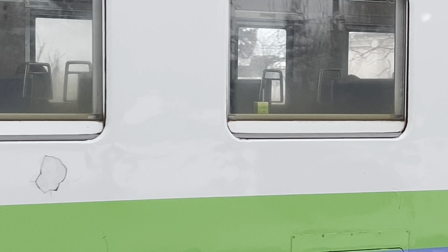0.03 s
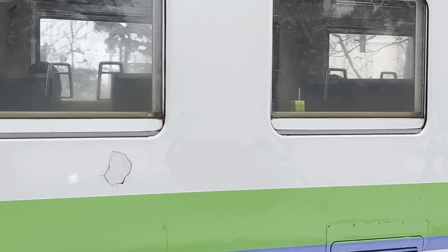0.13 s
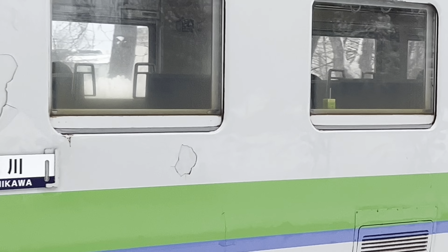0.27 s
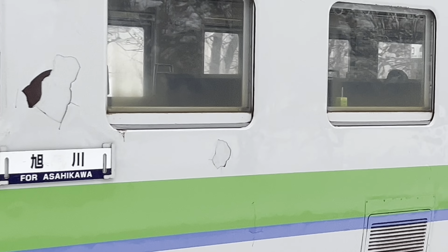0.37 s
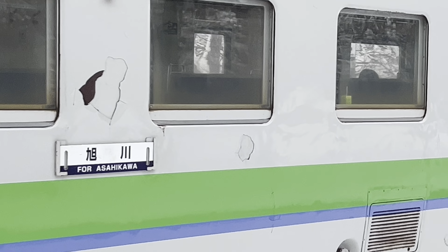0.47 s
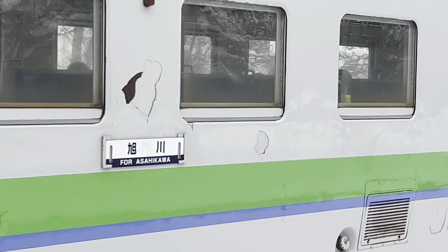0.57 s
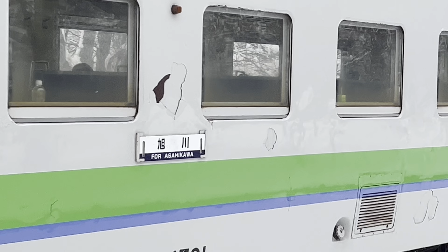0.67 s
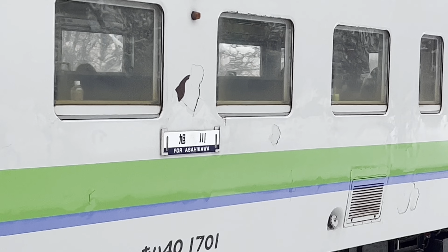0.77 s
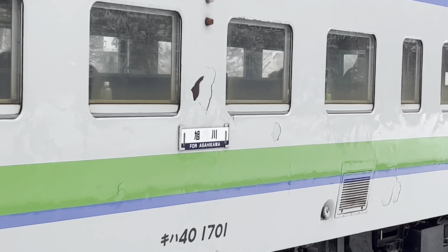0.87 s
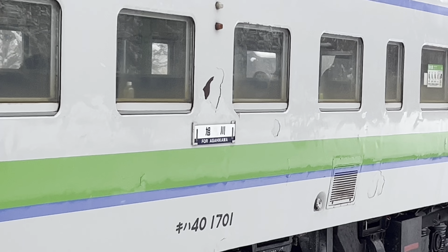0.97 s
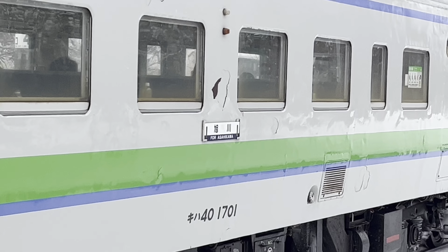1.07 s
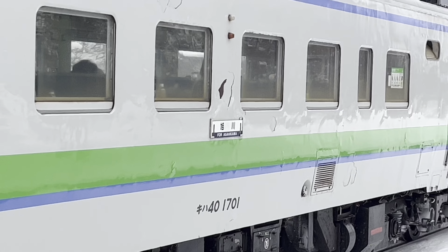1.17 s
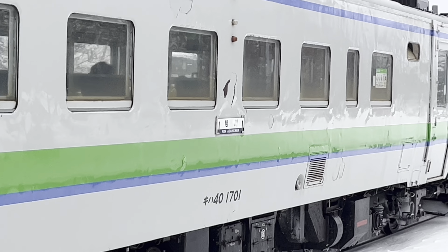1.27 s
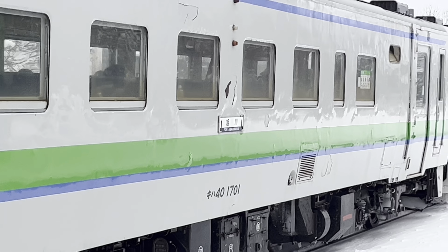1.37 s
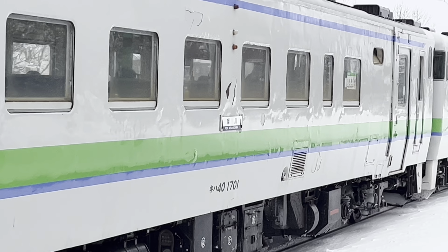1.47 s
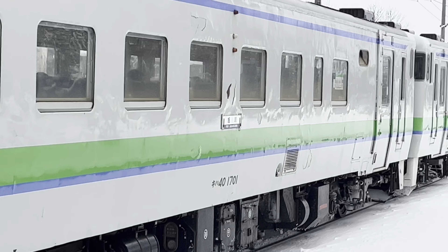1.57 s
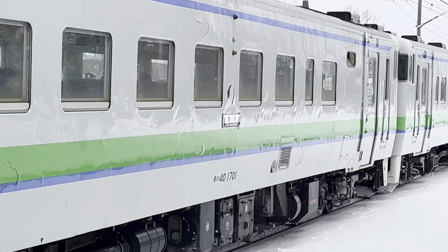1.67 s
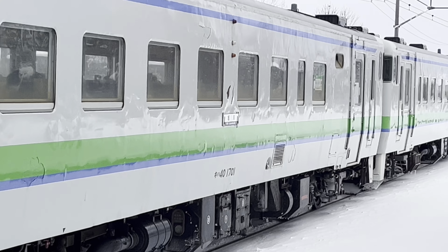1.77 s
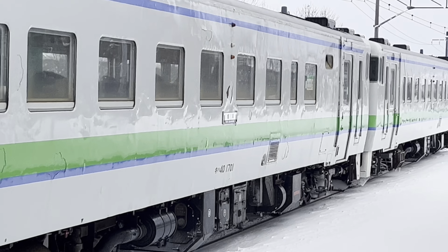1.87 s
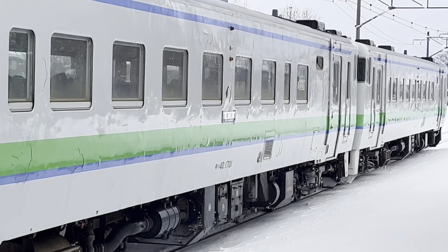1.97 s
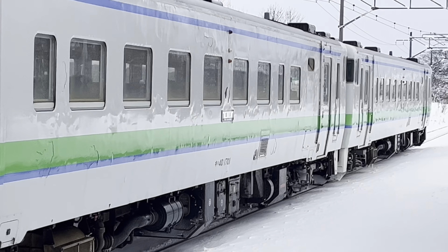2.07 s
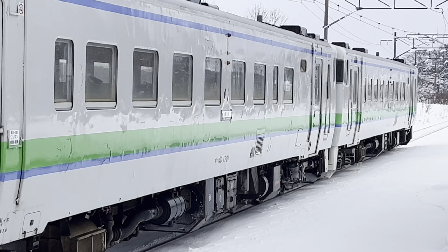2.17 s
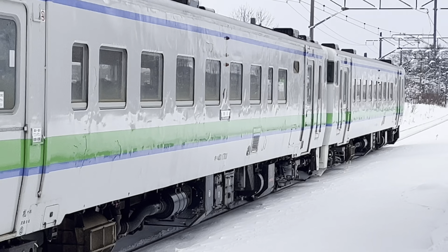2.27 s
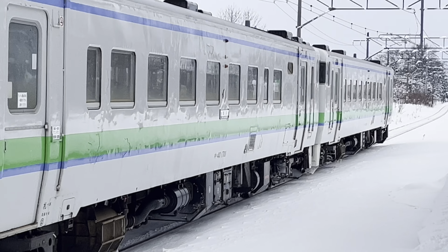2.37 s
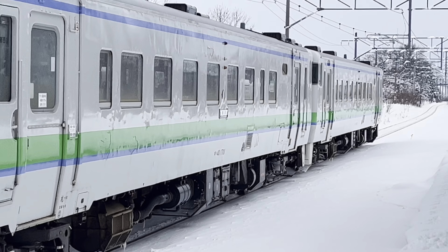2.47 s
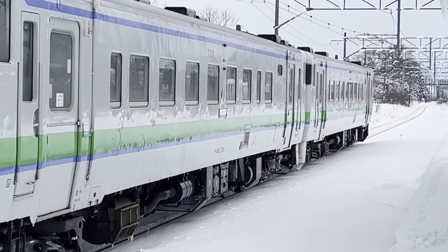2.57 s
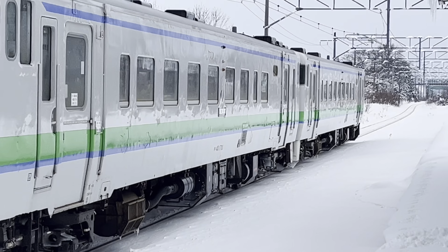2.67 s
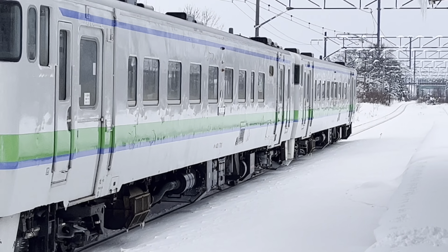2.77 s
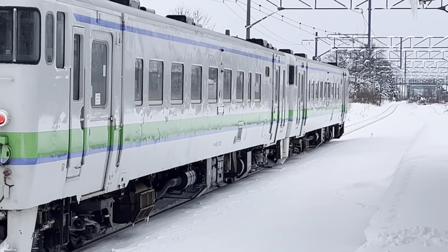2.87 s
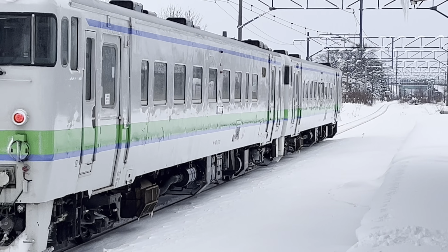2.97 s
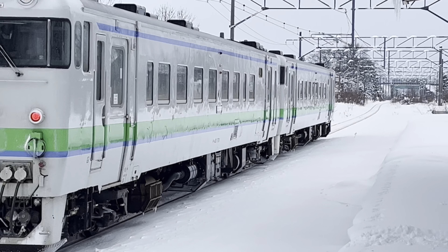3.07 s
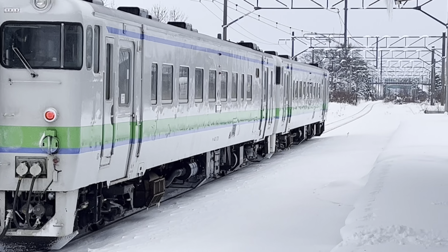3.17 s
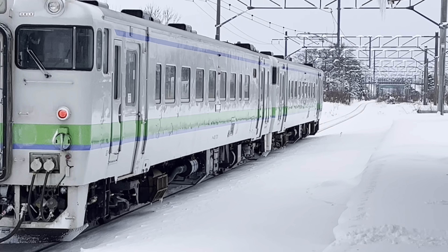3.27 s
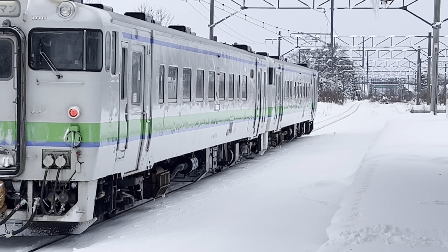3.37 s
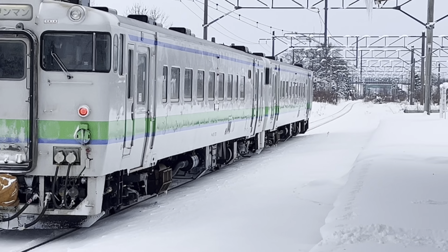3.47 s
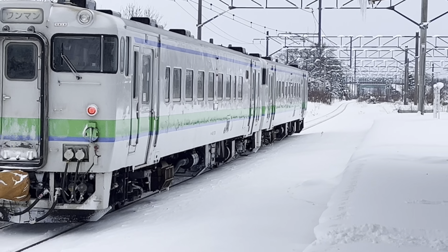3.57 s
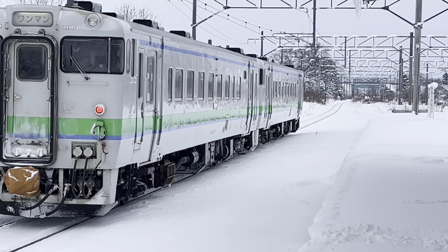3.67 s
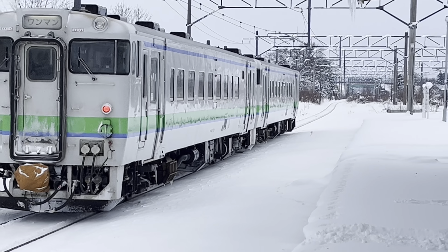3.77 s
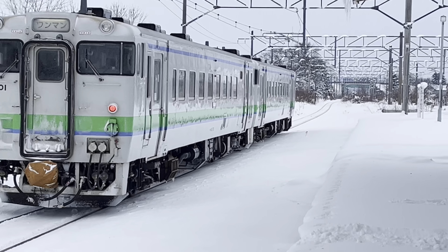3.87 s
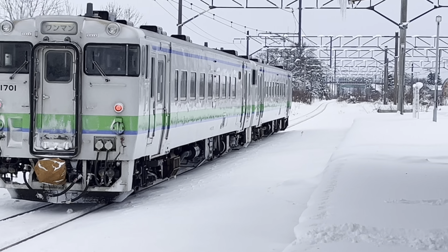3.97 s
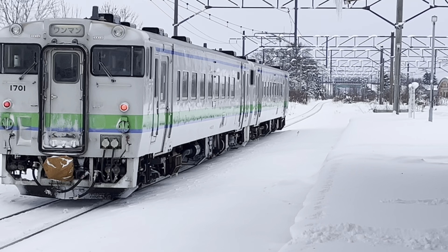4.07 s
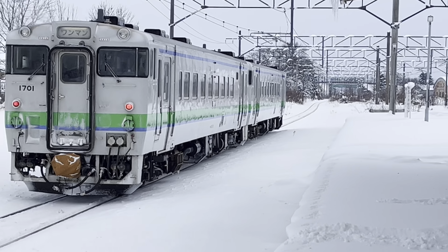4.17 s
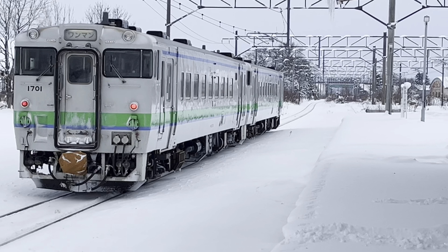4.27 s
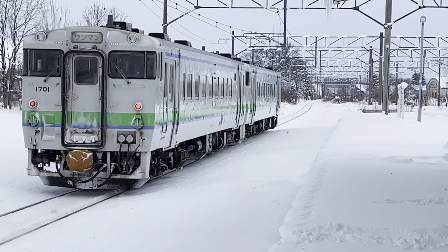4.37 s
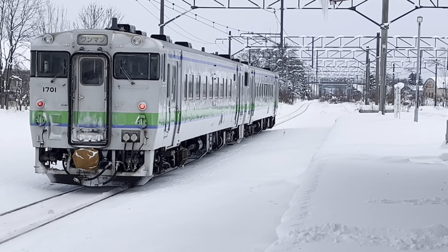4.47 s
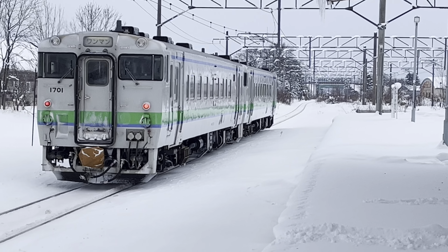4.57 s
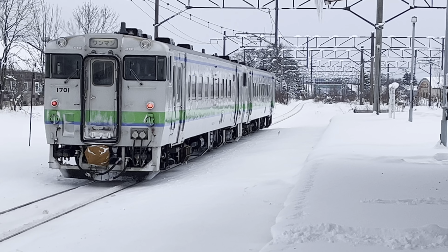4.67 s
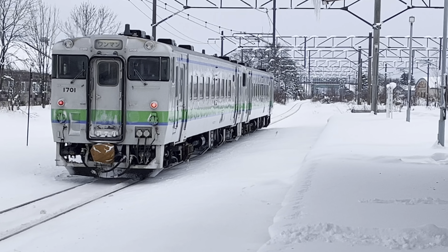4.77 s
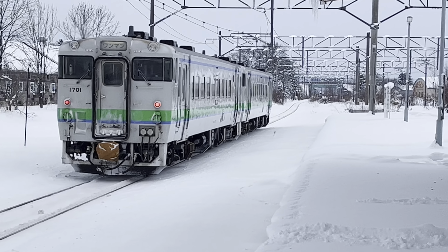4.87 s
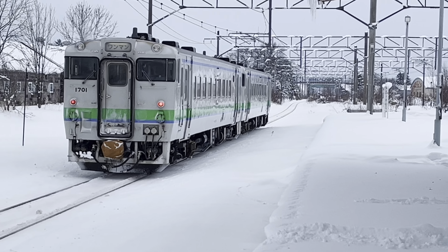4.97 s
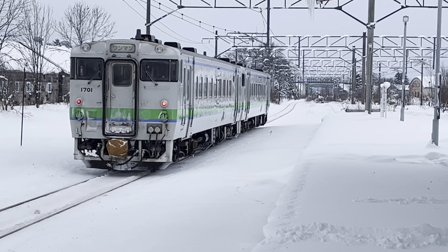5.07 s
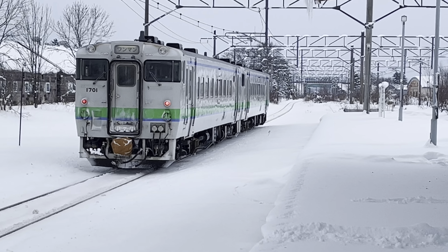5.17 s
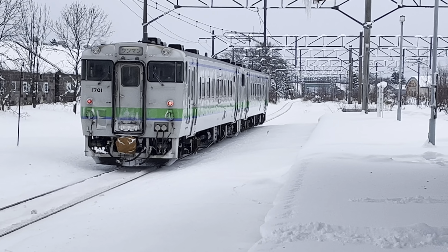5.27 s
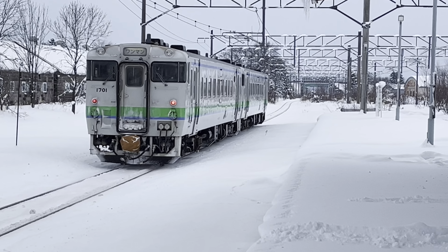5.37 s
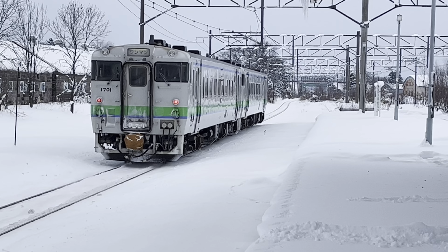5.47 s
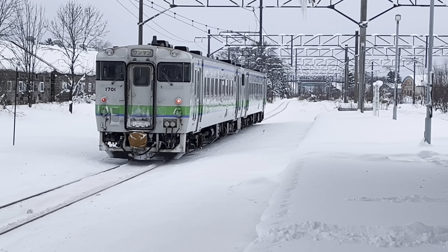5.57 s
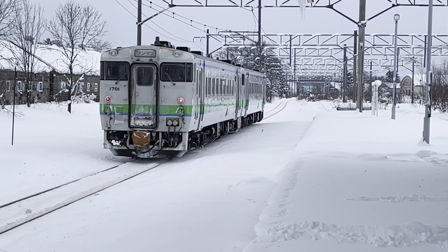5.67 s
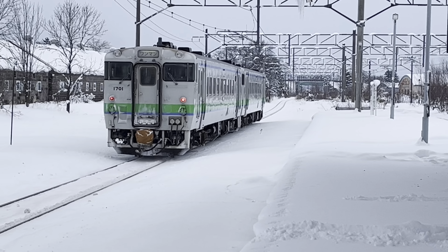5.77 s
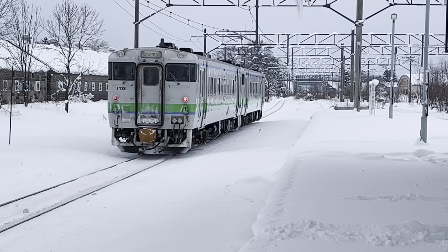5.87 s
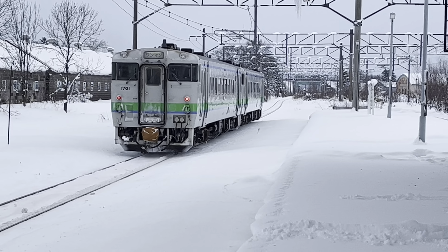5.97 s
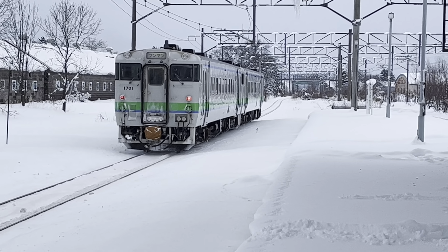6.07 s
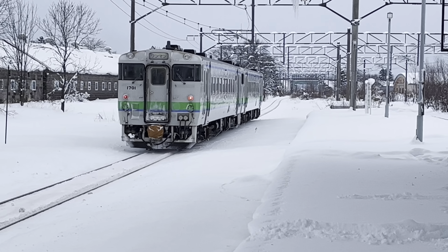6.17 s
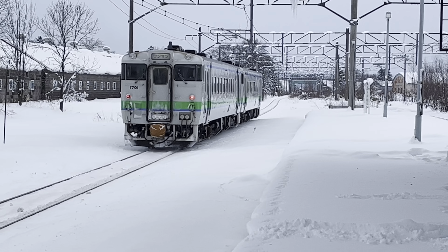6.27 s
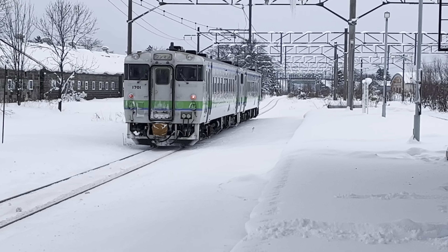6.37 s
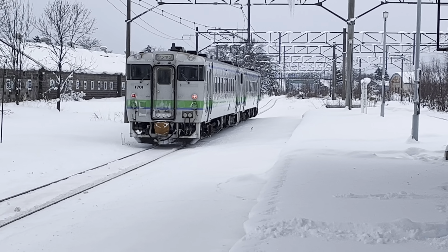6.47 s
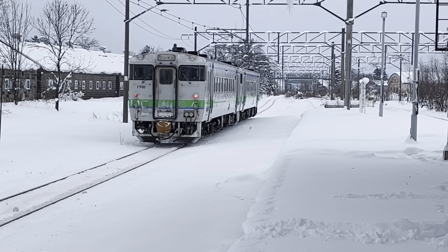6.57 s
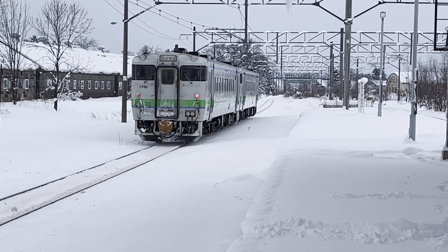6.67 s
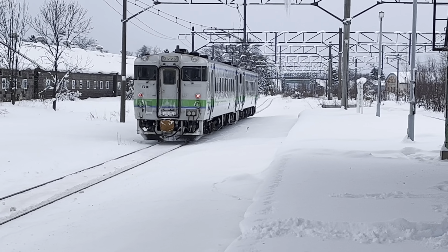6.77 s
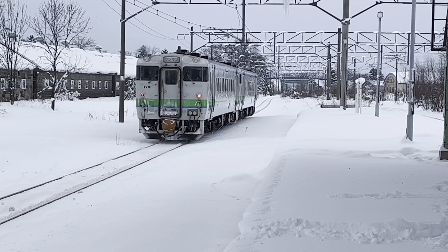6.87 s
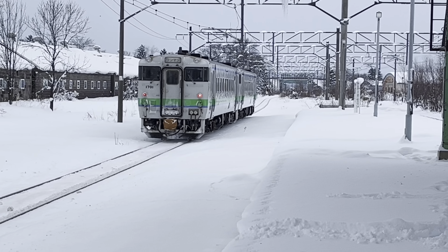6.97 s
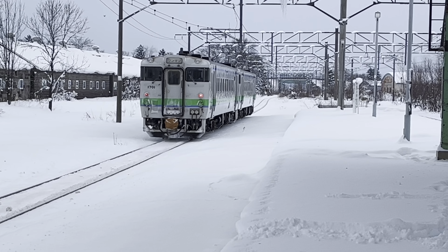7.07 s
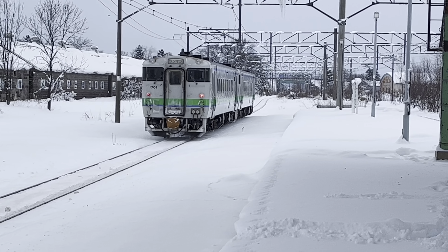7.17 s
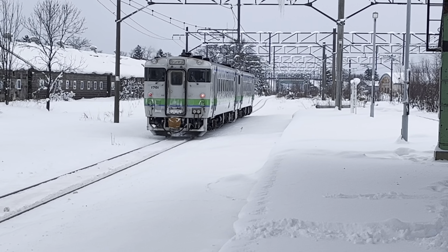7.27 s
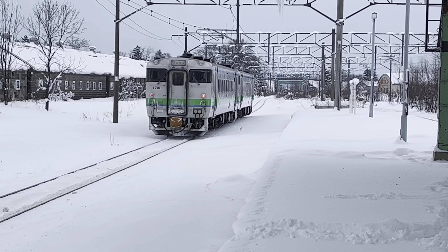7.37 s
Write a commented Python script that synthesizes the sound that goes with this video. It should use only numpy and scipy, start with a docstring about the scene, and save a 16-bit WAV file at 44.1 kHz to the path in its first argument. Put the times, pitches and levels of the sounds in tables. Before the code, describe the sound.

Outdoors on a snowy platform, with no echo, a diesel railcar is already passing very close at 0 s. Its underfloor engine runs at full power: a thick, rapidly pulsing roar, metallic clatter, bright hiss, and irregular hard steel knocks, strongest around 0.2-1.4 s. A buzzing drone and gear whine swell as parts go by, with a thin high turbo whistle from about 1 s. Pitch rises slightly until 1.8 s, then sags as the sound shifts from the side to straight ahead. At 2.55 s power is cut: knocking drops away, the engine slows and whistles slide downward, over wheel rumble and low, lumpy air gusts from 2.8 to 3.8 s. Around 3.84 s the engine pulls again with a brief breathy upward sweep, slower and throbbing. Faint ticks accompany it from 4.4 to 6 s. It slowly quickens while receding, turning duller after 6 s and still audible at 7.4 s.

```python
"""Diesel railcar pulling out

A railcar pulls out past a snowy platform, its underfloor six-cylinder engine at full power: noise pulsed
by the firings makes roar, clatter and hiss, ringing noise the knock and clang, and sine waves the drone.
At 2.55 s the fuel is cut for a gear change: the knock sinks and the turbocharger's whistles wind down.
At 3.84 s the engine pulls again, slower and farther off, over wheel rumble and gusts of filtered noise."""
import sys
import numpy as np
from scipy import signal
from scipy.fft import rfft, irfft, next_fast_len
from scipy.io import wavfile
from scipy.ndimage import uniform_filter1d

SR = 44100
rng = np.random.default_rng(int(sys.argv[2]) if len(sys.argv) > 2 else 0)


def master_out(mix):
    """Clip the mix to full scale and print it as 16-bit PCM to the path in sys.argv[1]."""
    frames = np.transpose(np.atleast_2d(mix))
    ceiling = np.clip(frames, -1, 1)
    pcm = np.round(ceiling * 32767).astype(np.int16)
    wavfile.write(sys.argv[1], SR, pcm)


N = 327743
TIME = np.arange(N) / SR  # s
SIZE = next_fast_len(N + SR // 10, True)
BINS = np.maximum(np.fft.rfftfreq(SIZE, 1 / SR), 1)  # Hz

# share of roar and clatter that repeats every cycle, and how much of its pattern it keeps (both 0-1)
ROAR_REPEAT, ROAR_MEMORY = 0.4, 0.75
CLATTER_REPEAT, CLATTER_MEMORY = 0.55, 0.58
# scales the roar's unsteadiness (dB): strong beside the bay and far off, none at half nearness
ROAR_FLICKER_DB = 1.6

# roar spectrum beside the open engine bay: (frequency [Hz], relative density [dB per Hz])
ROAR_BESIDE = [(60, -33), (130, 0.5), (200, -5.5), (330, -0.5), (450, -3), (600, 1.5), (800, -5.5),
               (1400, -21), (4000, -62)]
# roar spectrum far from the bay: (frequency [Hz], relative density [dB per Hz])
ROAR_DISTANT = [(60, -25), (130, -1.5), (220, -1.5), (330, -3.5), (420, -0.5), (520, -0.5), (640, -10.5),
                (800, 3), (1400, -12.5), (4000, -74)]
# brief fades and swells of the roar: (time [s], half length [s], lift [dB])
ROAR_LIFTS = [(2.45, 0.07, 3), (5.1, 0.22, -4), (7.15, 0.091, 3)]


def roar(turns):
    """Low noise swelling at each firing; its colour changes as the engine bay turns away."""
    loose = pulsing(turns, depth=0.8, decay_s=0.0064)
    low = repeating(turns, ROAR_REPEAT, ROAR_MEMORY, loose)
    tone = near_to_far(coloured(low, ROAR_BESIDE), -0.5, coloured(low, ROAR_DISTANT), 0.5)
    flicker_db = (0.5 - bay()) * ROAR_FLICKER_DB * drift(9.8)
    gain = passing(level_db=-23.5, abreast_s=0.19, distance_m=4.83, falloff=1.613, coasting_db=-1.0)
    return tone * gain * from_db(humps_db(ROAR_LIFTS) + flicker_db)


# clatter of the block beside the bay: (frequency [Hz], relative density [dB per Hz])
CLATTER_BESIDE = [(300, -39), (600, -26), (760, -3), (1000, -1), (1220, -6.5), (1420, -0.5), (1650, -7),
                  (2100, -8.5), (2500, -18), (3200, -26), (6000, -60)]
# clatter of the block far off: (frequency [Hz], relative density [dB per Hz])
CLATTER_DISTANT = [(300, -34), (600, -1.5), (760, -5), (880, 0), (1020, -9), (1220, 0.5), (1620, -2),
                   (2100, -6.5), (2500, -14.5), (3200, -52), (6000, -58)]
# resonances of block and underframe: (frequency [Hz], width [Hz], lift [dB])
BLOCK_RESONANCES = [(733, 59, 2.5), (1803, 210, 5)]


def clatter(turns):
    """Rattle of the moving parts, largely alike in every cycle, lifted by resonances of the block."""
    loose = pulsing(turns, depth=0.028, decay_s=0.0072)
    middle = repeating(turns, CLATTER_REPEAT, CLATTER_MEMORY, loose)
    beside = coloured(middle, CLATTER_BESIDE, BLOCK_RESONANCES)
    distant = coloured(middle, CLATTER_DISTANT, BLOCK_RESONANCES)
    gain = passing(level_db=-24.5, abreast_s=0.74, distance_m=2.73, falloff=0.93, coasting_db=-3.5)
    return near_to_far(beside, 5.5, distant, -0.67) * gain


# hiss beside the bay: (frequency [Hz], relative density [dB per Hz])
HISS_BESIDE = [(1000, -5), (2200, 6), (2900, 1), (3900, 2), (4600, -2), (5100, -5), (7000, -5.5),
               (9000, -3), (10500, -9), (14500, -14.5)]
# hiss far off: (frequency [Hz], relative density [dB per Hz])
HISS_DISTANT = [(1000, -26), (2200, -2), (2900, 0), (3700, 3), (4600, -6), (5100, -8.5), (7000, -8),
                (8800, -13), (10500, -15), (14500, -25)]


def hiss(turns):
    """Bright noise with a partial pulse at each firing and a flickering level."""
    high = from_db(0.73 * drift(22.09)) * pulsing(turns, depth=0.34, decay_s=0.01)
    tone = near_to_far(coloured(high, HISS_BESIDE), 4.5, coloured(high, HISS_DISTANT), 2.0)
    return tone * passing(level_db=-32, abreast_s=0.63, distance_m=3.51, falloff=1.474, coasting_db=-2.0)


# repeating share, and how much of its pattern it keeps (both 0-1)
CLANG_REPEAT, CLANG_MEMORY = 0.93, 0.72
# width of the resonance (Hz); the throb comes this share of a cycle before its place in the table
CLANG_WIDTH_HZ, THROB_LEAD = 210, 0.03
EVEN_S = 0.012  # the shaking's own level is evened over this time, so the throb stands clear

# pitch of the block's main resonance: (time [s], frequency [Hz])
BLOCK_PITCH = [(0, 926), (2, 843), (3, 932), (5, 900), (6, 945), (7.43, 973)]
# throb within one engine cycle, scaled by the throb depth: (cycle position [0-1], level [dB])
CYCLE_THROB = [(0, -5), (.035, -1), (.1, -8), (.17, 0), (.31, -2), (.39, 6), (.46, 1), (.52, -7),
               (.575, 10), (.63, 8), (.67, -8), (.72, -3), (.8, -6), (.89, 4)]
# brief fades and swells of the resonance: (time [s], half length [s], lift [dB])
CLANG_LIFTS = [(0.81, 0.097, -8), (1.03, 0.048, 3.5), (2.85, 0.26, 3.5), (7.38, 0.094, -2.5)]


def clang(turns):
    """Some cylinders shake the block harder, so its main resonance throbs alike in every cycle."""
    hz, = in_time(BLOCK_PITCH)
    position, throb_db = np.transpose(CYCLE_THROB)
    # weak while coasting, deep under load behind the car
    hidden_loss = 1 - 0.42 * ramp(HIDDEN_S, HIDING_S)
    depth = 0.22 + fuel() * (0.95 - 0.54 * bay()) * hidden_loss
    rattle = repeating(turns, CLANG_REPEAT, CLANG_MEMORY, air())
    shake = rms_one(resonate(rattle, hz, width=162))
    power = uniform_filter1d(shake ** 2, int(EVEN_S * SR)) + 1e-3
    even = shake / power ** (.5 * np.clip(depth, 0, 1))
    throb = np.interp((turns + THROB_LEAD) % 1, position, throb_db, period=1)
    ring = rms_one(resonate(even * from_db(depth * throb), hz, CLANG_WIDTH_HZ))
    gain = passing(level_db=-23.0, abreast_s=0.64, distance_m=2.69, falloff=1.11, coasting_db=0.1)
    return ring * gain * from_db(humps_db(CLANG_LIFTS))


# no two knocks ring alike: scatter of their pitch (share) and of their strength (dB)
KNOCK_SCATTER, KNOCK_UNEVEN_DB = 0.014, 1.1

# steel resonances before the pitch ratio: (frequency [Hz], width [Hz], relative level [dB])
STEEL_MODES = [(3605, 200, 0), (4103, 340, 10.5), (6150, 740, -6.5)]
# glide of the ringing: (time [s], pitch ratio [1])
KNOCK_GLIDE = [(0, 1.055), (1.2, 1.035), (2.0, 1.01), (4.0, 1.025), (5.8, 1.04), (7.0, 1.06)]
# hardest knocks, level of the click before it rings: (time [s], level [dB])
KNOCK_ACCENTS = [(0.209, -26), (0.2756, -24), (0.3621, -27), (0.4698, -24), (0.6624, -18), (0.726, -21),
                 (0.738, -33), (0.9178, -30), (0.9497, -26.5), (1.1154, -26), (1.166, -25.5),
                 (1.3523, -30.5), (4.4643, -42), (4.5258, -48), (5.7615, -46), (5.9371, -44.5),
                 (6.2878, -48), (6.9765, -44)]


def knock(turns):
    """Each firing sets the engine's stiff steel parts ringing, far weaker without fuel."""
    pitch = in_time(KNOCK_GLIDE)[0] * (1 + KNOCK_SCATTER * drift(45))

    def ringing(clicks):
        cracks = bursts(clicks, decay_s=0.012)
        return sum(from_db(db) * resonate(cracks, hz * pitch, width) for hz, width, db in STEEL_MODES)

    steady = rms_one(ringing(firings(turns, KNOCK_UNEVEN_DB))) * from_db(2.1 * drift(17))
    gain = passing(level_db=-35.5, abreast_s=0.52, distance_m=2.22, falloff=0.89, coasting_db=-17.0)
    return gain * steady + from_db(8.5) * ringing(clicks_of(KNOCK_ACCENTS))


# unsteadiness of the orders (dB), and their phase wander (turns per multiple)
ORDER_FLICKER_DB, ORDER_WAVER = 1.1, 0.001

# engine orders, each swelling as its part goes by; the multiple is rounded to a whole number:
# (multiple of cycle rate [1], loudest at [s], half length [s], level [dB])
DRONE_ORDERS = [(6, 0.51, 1.6, -43.5), (9, 0.32, 0.15, -40), (9, 1.23, 0.17, -35.5), (9, 1.75, 0.16, -36.5),
                (11, 0.32, 0.42, -43.5), (11, 1.27, 0.38, -38.5), (12, 0.75, 0.61, -34.5),
                (12, 2.17, 0.32, -44), (15, 0.714, 0.062, -30), (15, 1.22, 0.21, -29.5),
                (15, 1.623, 0.15, -30.5), (15, 1.97, 0.51, -44.5), (18, 1.23, 0.58, -38),
                (19, 0.44, 0.13, -42), (20, 0.35, 0.27, -37), (21, 0.22, 0.78, -45), (23, 0.257, 0.12, -32),
                (24, 0.56, 0.12, -30), (26, 1.21, 0.39, -39), (30, 0.78, 0.37, -35.5),
                (33, 0.95, 0.15, -36), (36, 0.23, 0.49, -28), (36, 1.05, 0.092, -38), (38, 1.34, 0.33, -41),
                (45, 1.1, 0.2, -43), (48, 1.45, 0.13, -41), (51, 0.64, 0.084, -32), (52, 1.56, 0.12, -43),
                (53, 0.92, 0.14, -36), (54, 0.976, 0.12, -26), (56, 1.19, 0.16, -28),
                (57, 0.6, 0.096, -22.5), (57, 1.08, 0.065, -36), (58, 1.04, 0.28, -39),
                (60, 0.44, 0.23, -29.5), (68.2, 0.76, 0.14, -33)]


def drone(turns):
    """Sines at multiples of the cycle rate swell in passing, wavering a little as their paths change."""
    gains = {}
    for order, loudest_s, half_s, db in DRONE_ORDERS:
        order = round(order)
        gains[order] = gains.get(order, 0) + from_db(db) * swell(loudest_s, half_s)
    out = np.zeros(N)
    for order, gain in gains.items():
        phase = order * turns + rng.random() + ORDER_WAVER * order * drift(14.9)
        out += gain * from_db(ORDER_FLICKER_DB * drift(11.9)) * np.sin(2 * np.pi * phase)
    return np.sqrt(2) * out


# breadth of the whistles and of the intake's note (Hz), and their waver (share of the pitch)
WHISTLE_WIDTH_HZ, INTAKE_WIDTH_HZ, WHISTLE_WAVER = 55, 280, 0.003

# turbocharger whistle: (time [s], frequency [Hz], level [dB])
MAIN_WHISTLE = [(.5, 5620, -62), (.85, 6050, -57), (1.05, 6020, -42), (1.45, 6170, -51), (1.8, 6260, -50),
                (2.1, 6280, -55), (2.3, 5960, -57), (2.55, 5830, -64), (2.65, 5600, -58), (2.77, 5300, -62),
                (2.88, 5120, -57), (2.94, 5040, -68), (3.05, 4860, -61), (3.17, 4700, -65),
                (3.38, 4420, -58), (3.48, 4340, -76), (3.8, 4500, -88), (5.2, 6540, -78), (5.65, 6660, -64),
                (7.43, 6900, -97)]
# fainter, higher whistle: (time [s], frequency [Hz], level [dB])
HIGH_WHISTLE = [(1.2, 6470, -69), (1.551, 6700, -57), (1.8, 6950, -68), (2.201, 6540, -60),
                (2.6, 5980, -78), (3.2, 5650, -82), (3.48, 5120, -72), (3.6, 4900, -76), (3.7, 4900, -66),
                (3.8, 4730, -80), (3.95, 4700, -99)]
# the intake sings up as the engine takes the load again: (time [s], frequency [Hz], level [dB])
INTAKE_SWEEP = [(3.74, 5750, -110), (3.79, 5900, -52), (3.86, 6100, -67), (3.92, 6320, -61),
                (4.0, 6380, -70), (4.14, 6420, -67), (4.5, 6530, -64), (4.9, 6500, -110)]


def turbocharger():
    """Narrow noise bands: the whistles wind down without fuel, the intake sweeps up when it returns."""
    def breathy(curve, width):
        hz, db = in_time(curve)
        wavering_hz = hz * (1 + WHISTLE_WAVER * drift(25))
        return from_db(db) * rms_one(resonate(rng.standard_normal(N), wavering_hz, width))

    whistles = breathy(MAIN_WHISTLE, WHISTLE_WIDTH_HZ) + breathy(HIGH_WHISTLE, WHISTLE_WIDTH_HZ)
    return whistles + breathy(INTAKE_SWEEP, INTAKE_WIDTH_HZ)


# pitch (Hz), its wander (share), flicker (dB)
UPPER_RING_HZ, UPPER_RING_WANDER, UPPER_RING_FLICKER_DB = 1430, 0.016, 2.0


def upper_ring(turns):
    """A weaker resonance of the underframe, loudest about 1.4 s; its pitch and level wander."""
    hz = UPPER_RING_HZ * (1 + UPPER_RING_WANDER * drift(7))
    rattle = repeating(turns, CLATTER_REPEAT, CLATTER_MEMORY, air())
    ring = rms_one(resonate(rattle, hz, width=95)) * from_db(UPPER_RING_FLICKER_DB * drift(16))
    return ring * passing(level_db=-39, abreast_s=1.4, distance_m=3.4, falloff=0.66, coasting_db=-1.5)


GEAR_HZ, GEAR_RISE_HZ_PER_S = 598, 25  # pitch at the start, and its climb with road speed

# the whine stands out as the axle drive goes by: (loudest at [s], half length [s], level [dB])
AXLE_SWELLS = [(0.3, 0.25, -34), (1.94, 0.14, -39.5), (2.418, 0.26, -43)]


def transmission():
    """A slightly unsteady gear whine, a sine that rises as the train gathers speed."""
    gain = sum(from_db(db) * swell(at_s, half_s) for at_s, half_s, db in AXLE_SWELLS)
    hz = (GEAR_HZ + GEAR_RISE_HZ_PER_S * TIME) * (1 + 0.004 * drift(60))
    whine = np.sqrt(2) * np.sin(2 * np.pi * np.cumsum(hz) / SR)
    return gain * from_db(2.2 * drift(20)) * whine


# while the engine labours (s); level of the click before the high-pass, and its scatter (dB)
TICKS_FROM_S, TICKS_TO_S, TICK_DB, TICK_SPREAD_DB = 4.382, 5.95, -56.5, 2.5


def ticks(turns):
    """The injection gear gives one faint bright crack per engine cycle, unequal in strength."""
    first, last = np.interp([TICKS_FROM_S, TICKS_TO_S], TIME, turns)
    s = np.interp(np.arange(first, last), turns, TIME)
    db = TICK_DB + TICK_SPREAD_DB * np.clip(rng.standard_normal(len(s)), -2, 1)
    cracks = bursts(clicks_of(np.column_stack([s, db])), decay_s=0.007)
    return signal.sosfilt(signal.butter(2, 4500, "high", fs=SR, output="sos"), cracks)


GUST_RAMP_S, GUST_FLUTTER_DB = 0.024, 5.0  # onset and end of a gust, unevenness of its flutter

# spectrum of wheels and deep push: (frequency [Hz], relative density [dB per Hz])
WHEEL_COLOUR = [(15, -49), (28, -45), (42, -4.5), (62, -0.5), (85, 0.5), (120, -9), (180, -27),
                (300, -20.5), (800, -98)]
# the wheel rumble swells and fades: (time [s], half length [s], lift [dB])
WHEEL_LIFTS = [(0.3, 0.15, 2.5), (0.8, 0.082, 6.5), (1.8, 0.081, 8), (2.35, 0.14, 4), (3.94, 0.25, -2),
               (5.27, 0.16, -7), (5.55, 0.13, 3.5)]
# air dragged behind the last car: (start [s], end [s], deep push [dB], flutter [dB])
WAKE_GUSTS = [(2.824, 3.8, -41, -47.5), (3.056, 3.235, -54, -45), (4.175, 4.465, -43.5, -59)]


def rumble():
    """Low noise for wheels rolling on the rails, and lumpy gusts in the wake of the car."""
    wheels = passing(level_db=-36.5, abreast_s=0.41, distance_m=7.34, falloff=1.28)
    wheels = wheels * from_db(humps_db(WHEEL_LIFTS))
    push, flutter = 0, 0
    for start_s, end_s, push_db, flutter_db in WAKE_GUSTS:
        gust = ramp(start_s, GUST_RAMP_S) * (1 - ramp(end_s, GUST_RAMP_S))
        push = push + from_db(push_db) * gust
        flutter = flutter + from_db(flutter_db) * gust
    # (frequency [Hz], relative density [dB per Hz])
    flutter_colour = [(40, -21), (110, 7.0), (160, -2), (270, -4.5), (500, -36), (1500, -70)]
    wake = flutter * from_db(GUST_FLUTTER_DB * drift(30)) * coloured(air(), flutter_colour)
    return np.hypot(wheels, push) * coloured(air(), WHEEL_COLOUR) + wake


FIRING_LAG = 0.02  # the firings come this share of a cycle late

# relative strength of each cylinder in firing order: (level [dB])
CYLINDER_STRENGTH = [8, 4, 1.5, 7, -2.5, 4]


def firings(turns, uneven_db):
    """One click per cylinder firing, its strength set by the cylinder and by chance."""
    cylinders = len(CYLINDER_STRENGTH)
    count = np.floor((turns - FIRING_LAG) * cylinders).astype(int)
    at = np.flatnonzero(np.diff(count))
    chance_db = uneven_db * np.clip(rng.standard_normal(len(at)), -2, 2)
    clicks = np.zeros(N)
    clicks[at] = from_db(np.take(CYLINDER_STRENGTH, count[at] % cylinders) + chance_db)
    return clicks


def pulsing(turns, depth, decay_s):
    """Noise that swells at each firing; depth is the pulsed share of the power."""
    pulses = rms_one(bursts(firings(turns, uneven_db=3.0), decay_s))
    return np.sqrt(depth) * pulses + np.sqrt(1 - depth) * air()


COASTING_LOOSENS = 0.55  # share of the regularity lost while coasting


def repeating(turns, share, memory, loose):
    """Valves, gears and pistons rattle nearly alike each cycle, changing slowly as the car moves on."""
    size = SR // 16  # noise points per cycle
    noise = rng.standard_normal((160, 2, size))
    # each cycle keeps much of the ones before; the first 20 let the memory settle
    cycles = signal.lfilter([1], [1, -2 * memory, memory ** 2], noise, axis=0)[20:]
    points = np.arange(len(cycles) * size)
    rattle = np.array([np.interp(turns * size, points, one.ravel()) for one in cycles.swapaxes(0, 1)])
    share = share * (1 - COASTING_LOOSENS * (1 - fuel()))
    return np.sqrt(share * 2 / 3) * rms_one(rattle) + np.sqrt(1 - share) * loose


# the fuel is cut for the gear change, then comes back
FUEL_OFF_S, FUEL_ON_S, FUEL_RAMP_S = 2.55, 3.84, 0.1


def fuel():
    """1 under load, 0 while coasting."""
    return 1 - ramp(FUEL_OFF_S, FUEL_RAMP_S) + ramp(FUEL_ON_S, FUEL_RAMP_S)


TRAIN_M_PER_S = 5.0


def passing(level_db, abreast_s, distance_m, falloff, coasting_db=0):
    """Gain of a part rolling by: falls as a power of distance, and shifts by coasting_db without fuel."""
    range_m = np.hypot(distance_m, TRAIN_M_PER_S * (TIME - abreast_s))
    return from_db(level_db + coasting_db * (1 - fuel())) * (distance_m / range_m) ** falloff


BAY_ABREAST_S, BAY_HALF_S = 0.23, 1.67  # the bay faces the platform; half length of its passing


def bay():
    """Nearness of the open engine bay, 0-1."""
    return 1 / (1 + ((TIME - BAY_ABREAST_S) / BAY_HALF_S) ** 2)


def near_to_far(beside, beside_db, distant, distant_db):
    """Blend two colours by the nearness of the bay."""
    near = bay()
    return near * from_db(beside_db) * beside + (1 - near) * from_db(distant_db) * distant


HIDDEN_S, HIDING_S = 6.03, 0.042  # the car's rear end hides the engine: moment, length of the change

# what the car's body does to the engine sound: (frequency [Hz], level [dB])
BODY_SHADOW = [(450, 1), (900, -1), (1600, -1.5), (3000, 1.5), (4300, -3.5), (7000, -2), (10000, -1)]


def hidden(x):
    """The engine turns duller once the car's body is in the way."""
    behind = ramp(HIDDEN_S, HIDING_S)
    shadowed = irfft(rfft(x, SIZE) * from_db(in_pitch(BODY_SHADOW)[0]), SIZE)[..., :N]
    return (1 - behind) * x + behind * shadowed


ENGINE_PASSES_S = 1.446  # from here on the sound comes from ahead

# left and right channels: (frequency [Hz], likeness beside the car [0-1], likeness behind it [0-1],
# left-right balance [dB], left leads beside the car [rad], left leads behind it [rad])
STEREO_IMAGE = [(60, .97, .88, 0, 0, 0), (270, .98, .5, -.3, .4, -.15), (550, .93, .82, .7, .7, .25),
                (900, .83, .91, 1.7, .85, .05), (1150, .75, .62, .3, 1.8, -.35),
                (1420, .76, .66, -6, 2.7, -.35), (1600, .8, .55, -6.3, 2.9, .3),
                (1720, .76, .76, -6.8, .4, -.2), (2000, .82, .65, -2.8, .7, .1),
                (2350, .92, .92, -3, .25, .25), (3000, .95, .95, -.6, .15, .2), (3500, .995, .995, 0, 0, 0),
                (5150, .99, .99, 0, 0, 0), (5700, .74, .74, 0, -1, -1), (6900, .8, .8, 0, -1.1, -1.1),
                (8400, .97, .97, 0, -3.1, -3.1), (10500, .6, .6, 0, -4.6, -4.6),
                (11300, .95, .95, 0, -6.28, -6.28), (13200, .9, .9, 0, -6.3, -6.3),
                (14400, .5, .5, 0, -8.8, -8.8)]


def stereo(direct, scattered):
    """The sound comes from the side at first, then from straight ahead."""
    alike_beside, alike_behind, balance_db, lead_beside, lead_behind = in_pitch(STEREO_IMAGE)
    beside = 1 / (1 + np.exp((TIME - ENGINE_PASSES_S) / 0.053))
    from_side = channels(direct, scattered, alike_beside, balance_db, lead_beside)
    from_ahead = channels(direct, scattered, alike_behind, balance_db, lead_behind)
    return beside * from_side + (1 - beside) * from_ahead


def channels(direct, scattered, alike, balance_db, lead):
    """Direct sound reaches both channels, scattered differs; balance and right phase vary by frequency."""
    mid = rfft(direct, SIZE) * np.sqrt((1 + alike) / 2)
    side = rfft(scattered, SIZE) * np.sqrt((1 - alike) / 2)
    balance = from_db(np.array([balance_db, -balance_db]) / 2)
    balance = balance / np.sqrt(np.mean(balance ** 2, axis=0))
    left, right = mid + side, (mid - side) * np.exp(-1j * lead)
    return irfft(balance * np.array([left, right]), SIZE)[:, :N]


def air():
    """Two unrelated noises: direct and scattered sound."""
    return rng.standard_normal((2, N))


def bursts(clicks, decay_s):
    """Each click becomes a short crack of noise."""
    envelope = signal.lfilter([1], [1, -np.exp(-1 / (decay_s * SR))], clicks + 1e-18)
    return envelope * air()


def clicks_of(events):
    """One click for each row of (time [s], level [dB])."""
    s, db = np.transpose(events)
    clicks = np.zeros(N)
    clicks[(s * SR).astype(int)] = from_db(db)
    return clicks


def resonate(x, hz, width):
    """Noise ringing in a narrow band round a centre that may glide."""
    r = np.exp(-np.pi * width / SR)
    carrier = np.exp(2j * np.pi * np.cumsum(hz) / SR)
    # shift the band down to zero, smooth it there, shift it back up
    envelope = signal.lfilter([(1 - r) ** 2], [1, -2 * r, r * r], x * np.conj(carrier) + 1e-18)
    return 2 * np.real(envelope * carrier)


def coloured(x, spectrum, resonances=()):
    """Give a signal a smooth spectrum with resonant humps; rms 1."""
    db, = in_pitch(spectrum)
    for hz, width, lift_db in resonances:
        db = db + lift_db / (1 + (2 * (BINS - hz) / width) ** 2)
    return rms_one(irfft(rfft(x, SIZE) * from_db(db), SIZE)[..., :N])


def drift(rate):
    """Slow chance with rms 1, gliding between random values drawn rate times a second."""
    knots = rng.standard_normal(4000)
    return rms_one(np.interp(TIME * rate, np.arange(len(knots)), knots))


def ramp(at_s, length_s):
    """A smooth step from 0 to 1."""
    return .5 + .5 * np.tanh(2 * (TIME - at_s) / length_s)


def swell(at_s, half_s):
    """A rounded hump of height 1."""
    return 1 / (1 + ((TIME - at_s) / half_s) ** 4)


def humps_db(rows):
    """Brief rises or dips of level."""
    return sum(db * swell(at_s, half_s) for at_s, half_s, db in rows)


def in_time(rows):
    """Each column of a curve at every sample."""
    s, *columns = np.transpose(rows)
    return [np.interp(TIME, s, c) for c in columns]


def in_pitch(rows):
    """Each column of a spectrum at every frequency bin."""
    hz, *columns = np.transpose(rows)
    return [np.interp(np.log(BINS), np.log(hz), c) for c in columns]


def from_db(db):
    """Decibels to amplitude."""
    return 10 ** (np.asarray(db) / 20)


def rms_one(x):
    """Scale a signal to rms 1."""
    return x / np.sqrt(np.mean(x ** 2) + 1e-20)


# engine speed as heard: (time [s], four-stroke cycles [per s])
ENGINE_SPEED = [(0, 15.17), (.35, 15.35), (.55, 15.52), (.95, 15.9), (1.15, 16.02), (1.55, 16.16),
                (1.8, 16.18), (1.95, 15.82), (2.15, 15.56), (2.55, 15.27), (3.8, 10.9), (4.4, 10.98),
                (5, 11.1), (5.8, 11.35), (7.43, 11.9)]


def scene():
    """One crankshaft drives the engine sounds; snow leaves no echo."""
    turns = np.cumsum(in_time(ENGINE_SPEED)[0]) / SR  # engine cycles so far
    body = roar(turns) + clatter(turns) + hiss(turns)
    engine = body + clang(turns) + knock(turns) + upper_ring(turns) + ticks(turns)
    direct, scattered = hidden(engine) + rumble()
    tones = drone(turns) + turbocharger() + transmission()
    return stereo(direct + tones, scattered)


CUTOFF_HZ = 14450


def record(dry):
    """The top is cut steeply."""
    return irfft(rfft(dry, SIZE) / (1 + (BINS / CUTOFF_HZ) ** 200), SIZE)[:, :N]


dry = scene()
out = record(dry)
master_out(out)
```